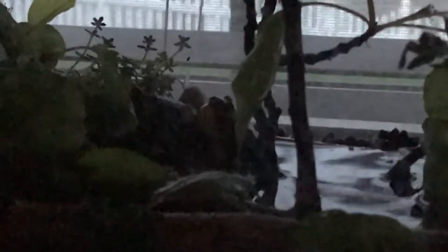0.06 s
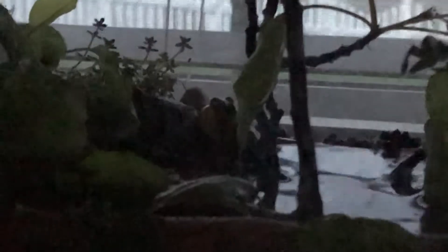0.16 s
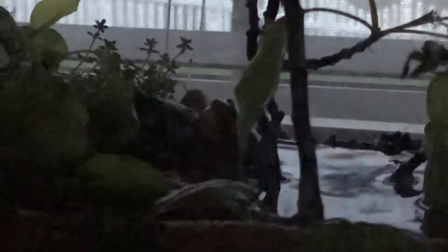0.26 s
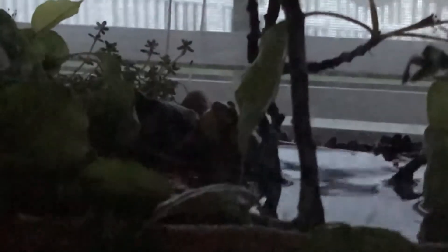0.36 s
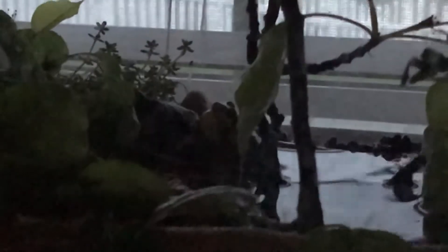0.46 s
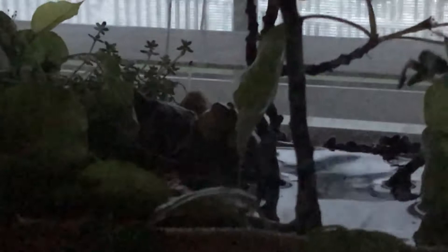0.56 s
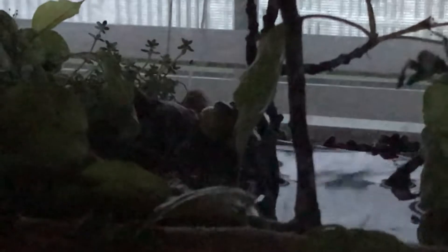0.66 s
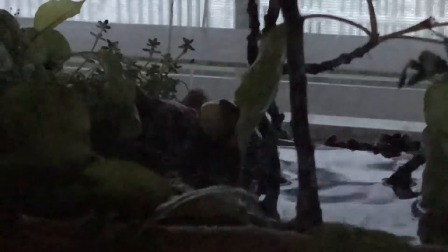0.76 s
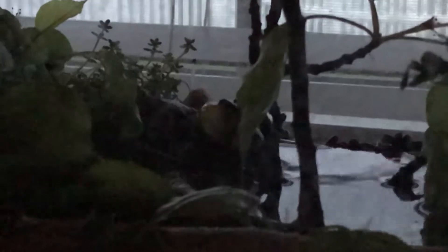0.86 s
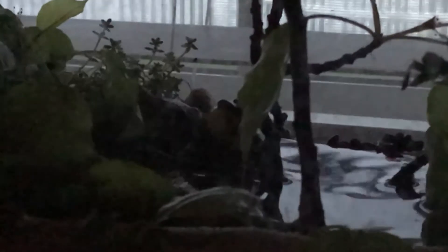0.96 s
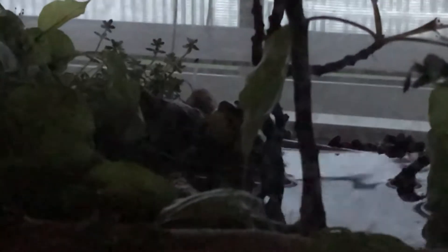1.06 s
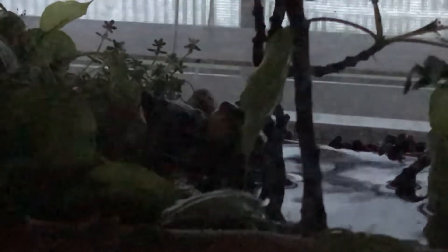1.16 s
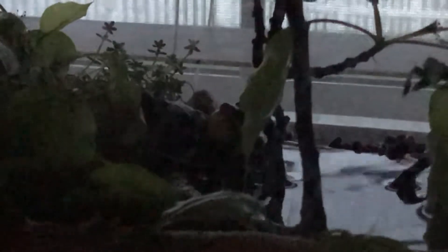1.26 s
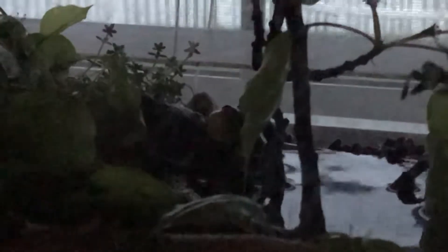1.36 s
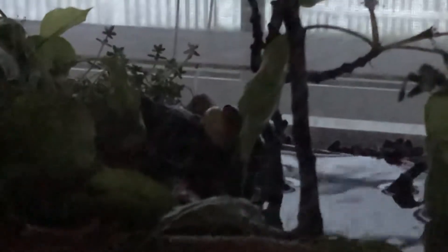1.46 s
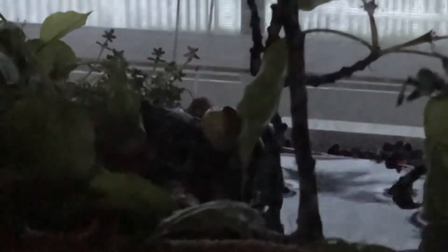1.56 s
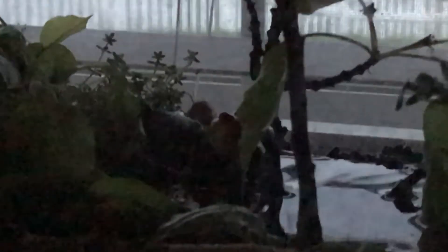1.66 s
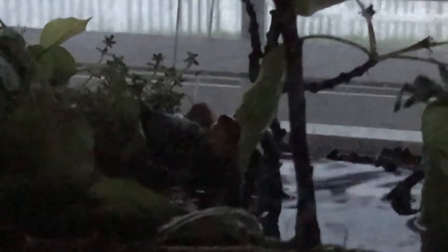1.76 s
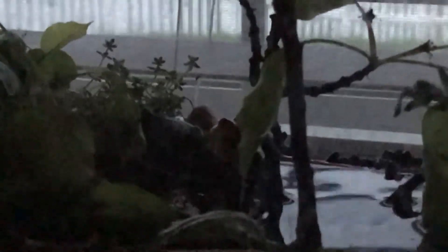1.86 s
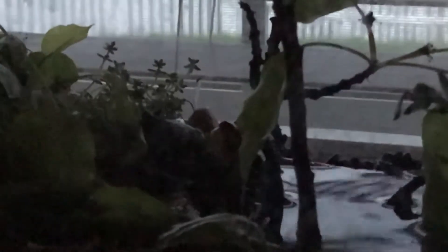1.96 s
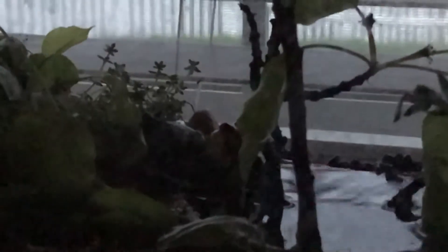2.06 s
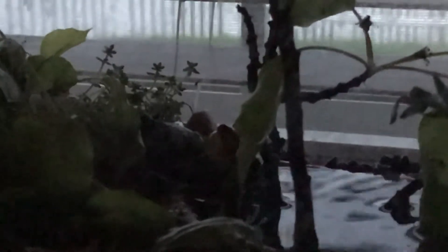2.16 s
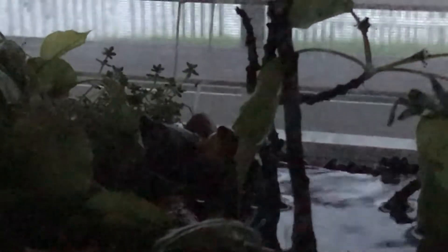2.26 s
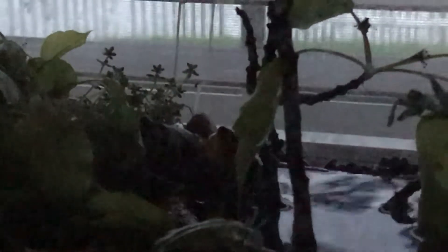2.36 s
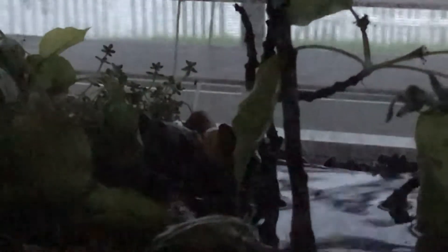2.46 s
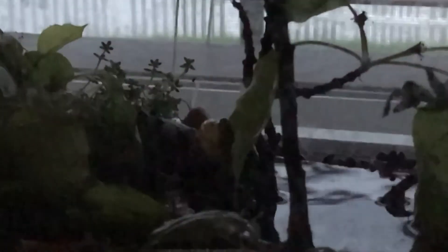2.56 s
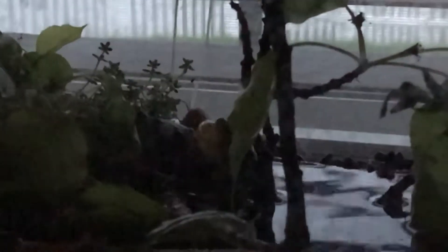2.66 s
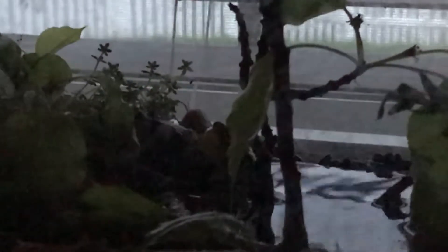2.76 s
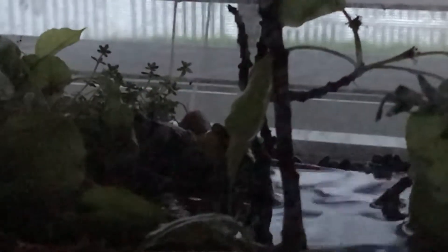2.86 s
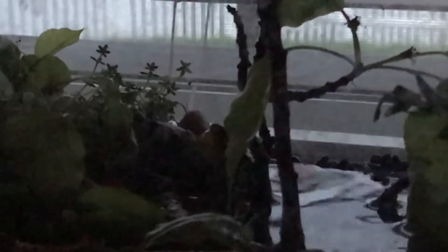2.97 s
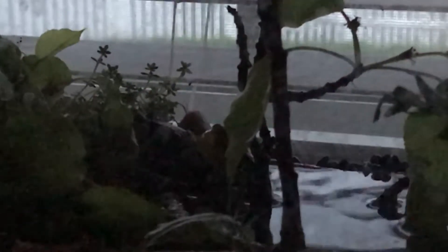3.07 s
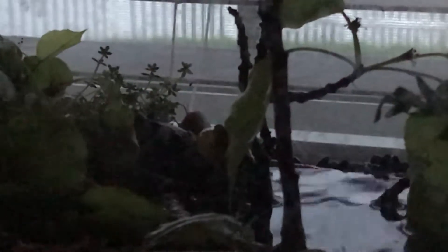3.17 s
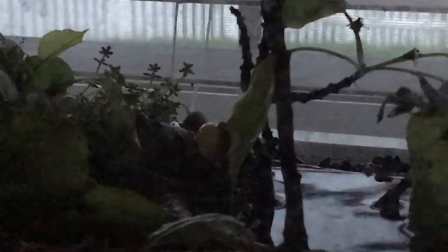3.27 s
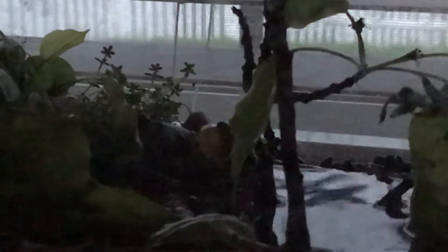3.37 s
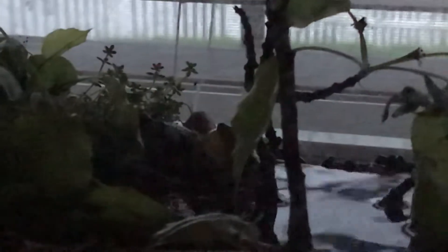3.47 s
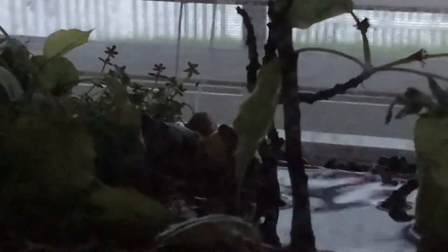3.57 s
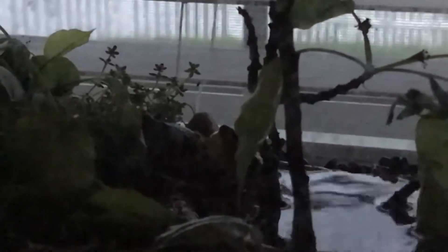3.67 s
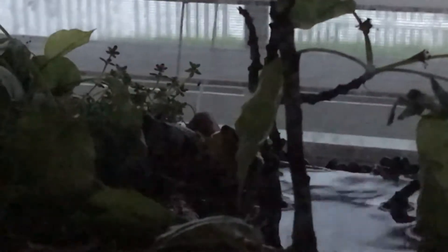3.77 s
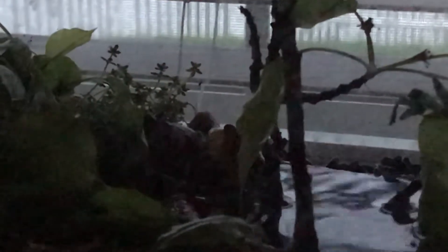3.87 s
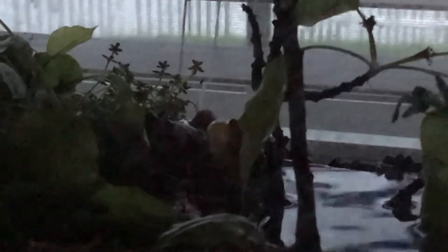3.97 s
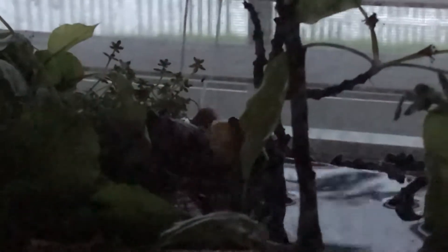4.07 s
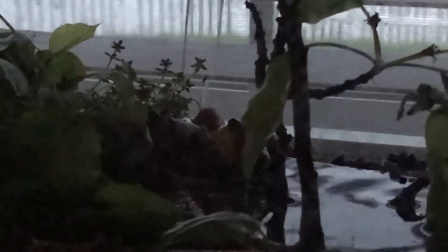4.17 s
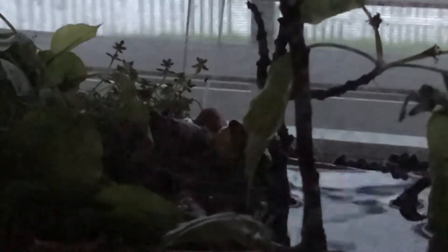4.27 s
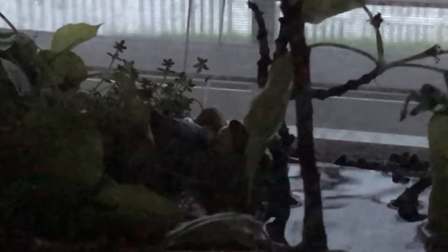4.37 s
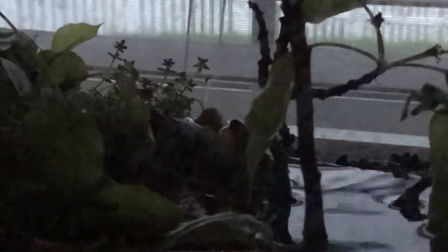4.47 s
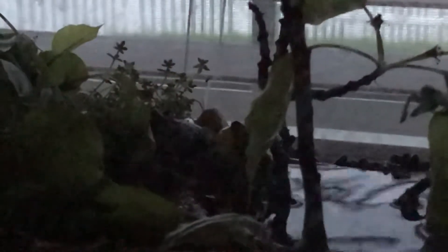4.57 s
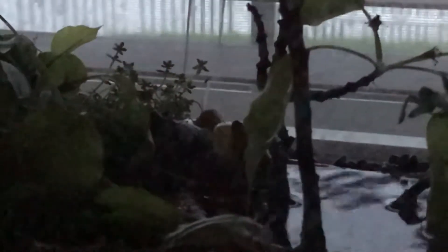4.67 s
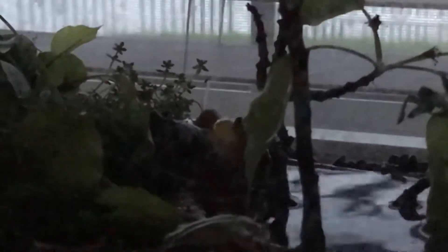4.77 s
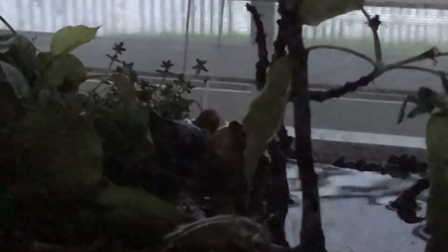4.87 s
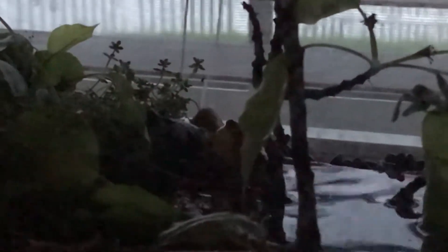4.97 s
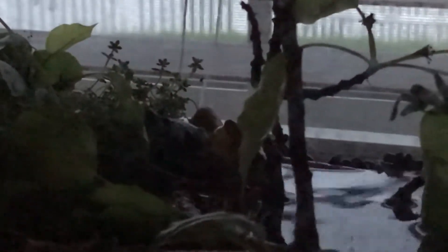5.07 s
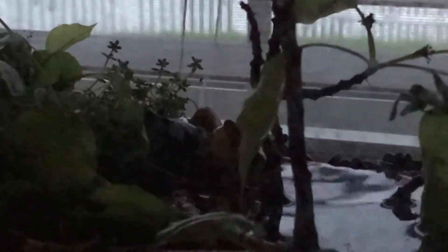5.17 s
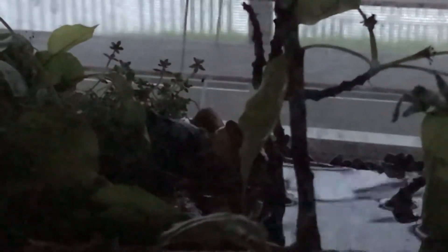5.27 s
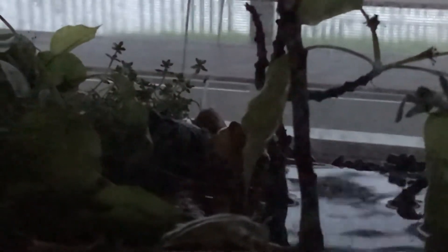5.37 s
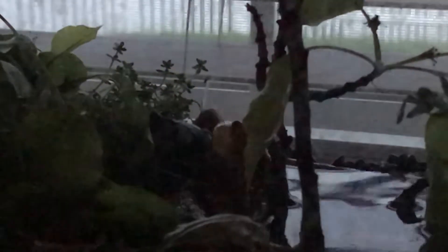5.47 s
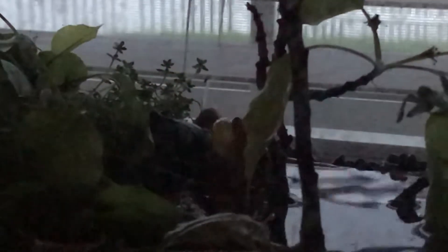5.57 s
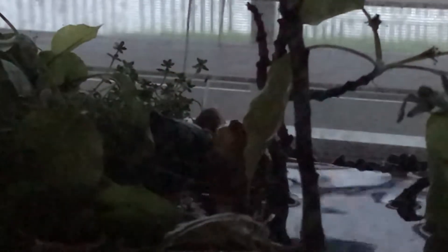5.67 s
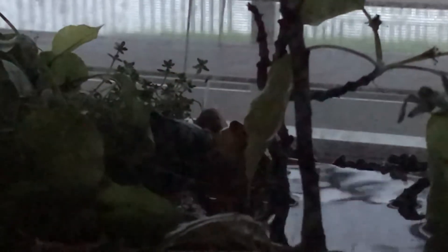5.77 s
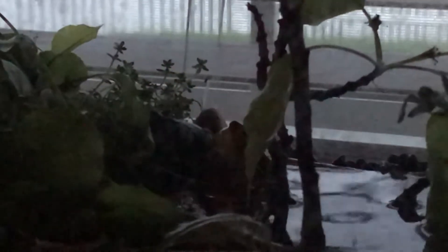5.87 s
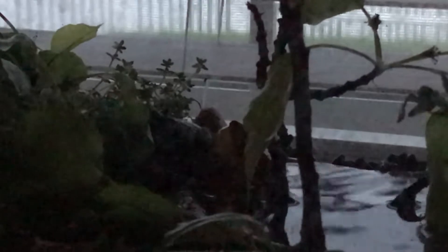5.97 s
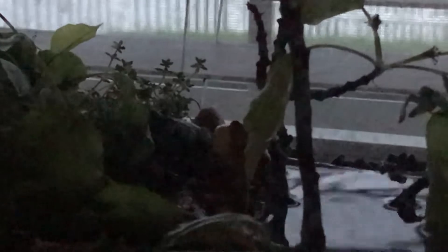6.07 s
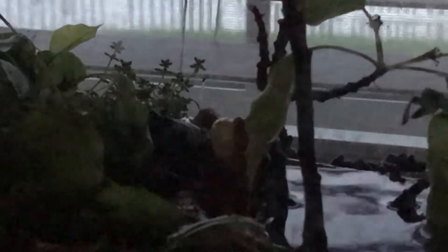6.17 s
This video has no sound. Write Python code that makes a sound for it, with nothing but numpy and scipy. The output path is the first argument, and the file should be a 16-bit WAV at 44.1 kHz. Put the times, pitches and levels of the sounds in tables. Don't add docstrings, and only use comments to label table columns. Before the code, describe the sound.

A small tree frog gives loud, short, raspy croaks at steady intervals in a glass tank while water drips and bubbles over low house rumble.

```python
import sys
import numpy as np
from scipy import signal
from scipy.io import wavfile
from scipy.ndimage import uniform_filter1d

SR = 44100
rng = np.random.default_rng(int(sys.argv[2]) if len(sys.argv) > 2 else 0)


def makeup_ratio(level_db):
    decades = np.asarray(level_db, float) / 20
    return 10 ** decades


def unload_wav(signal):
    wavfile.write(
        sys.argv[1],
        SR,
        np.round(np.clip(np.atleast_2d(signal).T, -1, 1) * 32767).astype(np.int16),
    )


N = 274743

# [t/s, peak level/dB, ring f/Hz]
FINE_SPRAY = [(.003, -42, 3280), (.2394, -63, 4450), (.312, -51, 9300), (.4628, -53, 2100),
              (2.199, -46, 11500), (1.8455, -54, 12000), (2.231, -45.5, 3380), (2.818, -51, 6100),
              (2.938, -52, 3400), (3.015, -50, 5370), (3.05, -45, 3540), (4.171, -44, 6100),
              (4.272, -54, 9270), (4.5714, -60, 3540), (5.1673, -46, 5060), (5.321, -48, 3280),
              (5.7223, -41, 2700), (.8565, -45, 8900), (.9108, -47, 9170), (1.3375, -48, 9520),
              (2.1634, -43.5, 9600), (3.8425, -42.5, 9700), (4.8663, -43, 9700), (4.9297, -48, 8550),
              (5.081, -35.5, 8600), (5.3627, -49, 13100), (5.505, -40, 12500), (5.73, -56, 9800),
              (5.9067, -45, 9540)]
# [t/s, peak level/dB, f/Hz]
OUTLET_BUBBLES = [(0.019, -37, 1125), (0.087, -46.5, 1540), (0.114, -48, 1540), (.2872, -50, 1490),
                  (0.6504, -47, 1220), (1.1857, -49, 1140), (1.2512, -40.5, 1120), (1.3388, -44.5, 1550),
                  (1.774, -47, 1200), (1.847, -45.5, 1126), (2.0697, -49, 1100), (2.324, -41.5, 1134),
                  (2.852, -37.5, 1590), (2.9435, -41, 1470), (3.024, -47.5, 1720), (3.0602, -47, 1137),
                  (3.698, -45.5, 1105), (3.7855, -43.5, 1070), (3.8223, -43.5, 1030), (3.8443, -38.5, 1380),
                  (4.342, -40, 1013), (4.5924, -48, 1050), (4.6164, -40, 830), (5.362, -44, 1540),
                  (5.3906, -48, 1120), (5.4247, -52, 1620), (5.8423, -46, 1470), (5.906, -44.5, 1460),
                  (5.9739, -45, 1720), (6.034, -43.5, 1570)]
# [t/s, peak level/dB, ring f/Hz]
LIGHT_DRIPS = [(0.0503, -54, 3670), (0.1024, -49, 3820), (.1516, -49.5, 5400), (0.357, -57, 5700),
               (.397, -62, 5100), (.4204, -57, 3430), (0.647, -52.5, 2730), (.9828, -50, 4260),
               (1.0592, -49.5, 5220), (1.0874, -46, 4380), (1.1863, -49.5, 4320), (1.196, -46, 6100),
               (1.8817, -46.5, 3810), (2.04, -47, 3440), (2.1485, -51.5, 5890), (2.3364, -50, 2240),
               (2.4507, -49, 3760), (2.8432, -45, 4290), (3.0994, -53.5, 5680), (3.6494, -49, 3520),
               (3.7874, -46.5, 3810), (4.2256, -51.5, 2810), (4.3414, -49, 2300), (4.4836, -48.5, 4860),
               (4.9723, -49, 3470), (5.137, -57, 3150), (5.3584, -55.5, 3500), (5.3943, -43.5, 3890),
               (5.9643, -47.5, 3860), (6.0326, -41, 4320)]
# [t/s, peak level/dB, ring f/Hz, time to fall 60 dB/s]
HEAVY_DROPS = [(0.2606, -41.5, 3610, 0.038), (.4828, -32.5, 4890, 0.025), (1.0211, -37, 4340, 0.036),
               (1.7645, -28.5, 6000, 0.015), (1.906, -27, 2520, 0.012), (1.9036, -34, 4740, 0.025),
               (2.2746, -37.5, 3580, 0.059), (2.294, -37.5, 4420, 0.057), (2.3094, -45.5, 3260, 0.081),
               (2.3834, -40, 2310, 0.045), (2.5026, -31.5, 3250, 0.069), (2.8514, -41, 3140, 0.058),
               (3.1785, -38.5, 3400, .02), (3.476, -38.5, 4600, 0.017), (3.6026, -42, 5920, 0.038),
               (3.69, -41, 3540, 0.059), (3.7103, -36, 5280, 0.02), (4.2978, -35, 5200, .022),
               (4.439, -40, 4240, .047), (4.4538, -37, 5320, 0.036), (4.5882, -42.5, 5180, 0.041),
               (4.637, -30.5, 2940, 0.012), (5.031, -45, 4340, 0.019), (5.2049, -35, 4210, 0.036),
               (5.2563, -39.5, 5260, 0.021), (5.4218, -41.5, 2320, 0.075), (5.7492, -38, 5120, .03),
               (5.821, -35.5, 3510, 0.026), (5.8457, -41.5, 3530, 0.058)]
# [f/Hz, level/dB per Hz]
RUMBLE_SPECTRUM = [(12, -57.5), (20, -28.5), (43, -21.5), (65, 1.5), (114, -7.5), (146, -1.5), (157, -11),
                   (170, -30.5), (220, -57.5), (370, -120)]
# [f/Hz, level/dB per Hz]
DRONE_SPECTRUM = [(97, -44), (165, -5.5), (210, 1.5), (322, -1.5), (361, 2), (480, -18.5), (524, -10),
                  (560, -11.5), (730, -11.5), (1230, -120)]
# [f/Hz, level/dB per Hz]
HISS_SPECTRUM = [(260, -31.5), (450, -2.5), (705, -9), (1140, -1.5), (1400, -9.5), (1530, -4.5), (2040, -6),
                 (3540, -6.5), (7690, -19.5), (13600, -16.5), (16000, -12)]
# [f/Hz, level/dB]
MAINS_HUM = [(59.2, -66)]
# [centre t/s, half length/s, rumble lift/dB, drone lift/dB]
HOUSE_SURGES = [
    (0.05, .3, 1, 1.5),
    (1.366, 0.04, 2.5, -1),
    (2.62, 0.075, 8, 4),
    (2.835, 0.083, 1, 9),
    (3.04, 0.046, 2.5, -2),
    (3.62, 0.063, 5, -2),
    (4.074, 0.13, 5, 7),
    (4.39, .07, 1.5, 2),
    (5.967, 0.14, 4, 1),
]
# [t/s, length/s, f/Hz, width/Hz, level/dB]
WALL_GROANS = [
    (2.62, 0.39, 207, 18, -55.5),
    (3.029, 0.045, 91, 21, -48),
    (3.558, 0.13, 210, 13, -60),
    (7.4, 0.09, 560, 39, -59.5),
    (4.02, .17, 270, 39, -56.5),
    (4.03, 0.22, 570, 100, -56),
    (4.31, 0.11, 218, 18, -58.5),
    (4.301, 0.108, 545, 23, -55.5),
    (4.3, 0.16, 720, 860, -58),
    (4.75, 0.19, 660, 220, -58),
]
# [t/s, length/s, effort level/dB, gear slip after t/s, larynx openings per second after the slip]
FROG_CROAKS = [
    (0.686, 0.21, -32, .05, 114),
    (1.394, 0.23, -31.5, 0.077, 113.6),
    (2.49, 0.21, -31, 0.062, 120),
    (3.185, 0.2, -30.5, 0.069, 117),
    (3.878, 0.2, -29.5, 0.05, 113),
    (4.649, 0.2, -30, .045, 119.5),
    (5.448, 0.2, -30, 0.074, 123.5),
    (6.09, 0.18, -30, .06, 110),
]
# [f/Hz, width/Hz, level/dB]
THROAT_RINGS = [(1084, 620, 5.5), (1437, 57, 10.5), (1720, 580, 4.5)]
# [f/Hz, width/Hz, level/dB]
MIDDLE_RINGS = [(1916, 70, -15), (2213, 1080, 7.5), (2575, 50, 11)]
# [f/Hz, width/Hz, level/dB]
SAC_RINGS = [(2672, 330, 1), (3196, 123, -10), (3555, 307, -12.5)]
# [f/Hz, width/Hz, level/dB]
UPPER_RINGS = [(4016, 750, 9.5), (4600, 134, 11), (5260, 1100, 6.5), (6084, 140, 3.5), (6380, 730, -3.5)]
# [f/Hz, width/Hz, level/dB]
BREATH_RINGS = [(8840, 1400, -2.4), (11620, 580, -0.49)]
# [delay t/s, level/dB]
GLASS_ECHOES = [
    (.0021, -31.5),
    (.0034, -12),
    (.0047, -16.5),
    (.0083, -17.5),
]
# [f/Hz, time to fall 60 dB/s]
ROOM_DECAY = [(600, 0.3), (1600, 0.3), (2700, 0.27), (4200, 0.38), (9000, 0.27), (15000, 0.017)]


def evened(x):
    return x / np.sqrt(np.mean(x ** 2) + 1e-20)


def read(points, hz):
    f, value = np.transpose(points)
    return np.interp(np.log(hz + 1), np.log(f + 1), value)


def add(mix, s, sound):
    part = mix[round(s * SR):][:len(sound)]
    part += sound[:len(part)]


def later(x, s):
    return np.pad(x, (round(s * SR), 0))[:len(x)]


def resonate(x, hz, width):
    turn = np.exp(2j * np.pi * np.cumsum(hz * np.ones(len(x))) / SR)
    r = np.exp(-np.pi * width / SR)
    smooth = signal.lfilter([(1 - r) ** 2], [1, -2 * r, r * r], x / turn)
    return 2 * (turn * smooth).real


def ring_together(x, modes):
    return sum((-1) ** k * makeup_ratio(db) * resonate(x, hz, width) for k, (hz, width, db) in enumerate(modes))


def drop(db, hz, tick_db, t60):
    t = np.arange(3500) / SR
    spray, fine = rng.standard_normal((2, 3500))
    ring = np.sin(2 * np.pi * hz * t * (1 + 0.98 * t)) * makeup_ratio(1.0 - 60 * t / max(0.37 * t60, .006))
    around = resonate(spray, 1.038 * hz, 0.39 * hz)
    above = resonate(spray, min(1.567 * hz, 15000), 0.21 * hz)
    splash = evened(around + 0.29 * above) * makeup_ratio(-9.0 - 60 * t / max(t60, .01))
    tick = evened(resonate(fine, 10500, 9000)) * makeup_ratio(tick_db - 6.0 - 60 * t / 0.01)
    return makeup_ratio(db - 8.5) * (ring + splash + tick) * np.clip(t / 0.0015, 0, 1)


def bubble(db, hz, cycles=5.5):
    u = np.arange(1500) / SR * hz / cycles
    tone = np.sin(2 * np.pi * cycles * u * (1 + 0.012 * u))
    return makeup_ratio(db - 0.5) * tone * u * np.exp(1 - 2.04 * u)


def water():
    drops, bubbles = np.zeros(N), np.zeros(N)
    for s, db, hz in FINE_SPRAY:
        add(drops, s, drop(db, hz, tick_db=-7.5, t60=0.016))
    for s, *row in OUTLET_BUBBLES:
        add(bubbles, s, bubble(*row))
    for s, db, hz in LIGHT_DRIPS:
        add(drops, s, drop(db, hz, tick_db=-3, t60=0.077))
    for s, db, hz, t60 in HEAVY_DROPS:
        add(drops, s, drop(db, hz, tick_db=-13, t60=t60))
    for when, size, pitch in rng.random((125, 3)):
        add(drops, when * N / SR, drop(-64 + 7.0 * size, 2300 * 4.5 ** pitch, tick_db=-2, t60=0.11))
    for when, size, pitch in rng.random((45, 3)):
        add(drops, when * N / SR, drop(-67 + 9 * size, 10800 * 1.35 ** pitch, tick_db=3.5, t60=0.08))
    for when, size, pitch in rng.random((20, 3)):
        add(bubbles, when * N / SR, bubble(-56 + 6 * size, 1050 * 1.5 ** pitch))
    return drops, bubbles


def noise(spectrum, patchy_db):
    hz = np.fft.rfftfreq(2048, 1 / SR)
    a, b, patches = rng.standard_normal((N // 512 + 5, 1025, 3)).T
    patches = uniform_filter1d(patches, size=16, axis=0)
    patches = evened(uniform_filter1d(patches, size=6, axis=1))
    z = (a + 1j * b) * makeup_ratio(read(spectrum, hz)[:, None] + patchy_db * patches)
    return evened(signal.istft(z, nperseg=2048, noverlap=1536)[1][:N])


def house():
    t = np.arange(N) / SR
    rumble_lift_db, drone_lift_db = sum(np.outer(lift_db, np.exp(-((t - s) / half) ** 2))
                                        for s, half, *lift_db in HOUSE_SURGES)
    out = makeup_ratio(-60.5 + rumble_lift_db) * noise(RUMBLE_SPECTRUM, patchy_db=0.4)
    out += makeup_ratio(-67 + drone_lift_db) * noise(DRONE_SPECTRUM, patchy_db=0.79)
    for start, length, hz, width, db in WALL_GROANS:
        fuzzy = resonate(rng.standard_normal(22050), hz, width)[-round(length * SR):]
        add(out, start, makeup_ratio(db) * evened(fuzzy) * np.hanning(len(fuzzy)))
    for hz, db in MAINS_HUM:
        out += makeup_ratio(db - 2.0) * evened(resonate(rng.standard_normal(N), hz, 4.1))
    return out + makeup_ratio(-65.5) * noise(HISS_SPECTRUM, patchy_db=1)


def breath_effort(t, length, top_db):
    effort_db = top_db - 8.5 * np.exp(-t / 0.011) - 6 * np.exp(-t / 0.034) - 15 * t
    return effort_db - 5.5 * np.clip(1 - (length - t) / 0.05, 0, 1)


def fold_buzz(t, slip_s, after):
    fold_hz, rough_upper, uneven_db = 555, 0.45, -1.6
    late = 124.6
    rate = np.interp(t, [slip_s - .006, slip_s + .006, .15, .17], [129.3, after, late, late - 4])
    rough = .12 + .33 * np.exp(-((t - slip_s) / .014) ** 2)
    rough += np.interp(t, [.01, .03, .15, .185], [.3, 0, 0, .4])
    openings = np.cumsum(rate) / SR
    phase, count = openings % 1, openings.astype(int)
    chance = rng.standard_normal((40, 5))[count]
    gate = np.sin(np.pi * np.clip(phase / .6, 0, 1)) ** 2
    gate *= makeup_ratio(uneven_db * chance[:, 0])
    drift = np.cumsum(rng.standard_normal(40))[count]
    tension = .88 + .22 * phase + .004 * drift + .04 * rough * chance[:, 1]
    turns = phase / rate * fold_hz * tension + .2 * rough * chance[:, 2]
    overtones = [np.cos(2 * np.pi * k * turns - .52 * k * k) for k in range(2, 14)]
    air = rng.standard_normal(12000)[:len(t)]
    low_air = evened(resonate(air, 1670, 2100))
    low = gate * (evened(sum(overtones[:6])) + rough * low_air) / np.hypot(1, rough)
    high_air = evened(resonate(air, 6650, 2800))
    high = (1 - rough_upper) * evened(sum(overtones[5:])) + rough_upper * high_air
    return low, (gate + 0.61) * high, (gate + 0.52) * air, chance


def upper_voice(t, high, hiss):
    edge_hz = np.interp(t, [0, .09, .17], [3100, 5700, 7000])
    modes = [(hz, width, db - .016 * np.maximum(hz - edge_hz, 0)) for hz, width, db in UPPER_RINGS]
    pocket = resonate(high, 0.918 * edge_hz, 600)
    pocket += makeup_ratio(-14) * resonate(hiss, np.interp(t, [.07, .16], [11900, 13100]), 900)
    return evened(ring_together(high, modes) + makeup_ratio(-2.0) * pocket)


def croak(start, length, top_db, slip_s, after):
    t = np.arange(0, length, 1 / SR)
    low, high, hiss, chance = fold_buzz(t, slip_s, after)
    sac_db = -8 + 11 * np.minimum(t / 0.14, 1)
    middle_db = -2.5 + np.where(t < 0.07, -12 * (1 - t / 0.07), -80 * (t - 0.07))
    bright_db = -17 - 29.5 * np.exp(-t / 0.018)
    shade = makeup_ratio(0.5 * uniform_filter1d(chance[:, 3:], size=200, axis=0)).T
    stretch = np.interp(t, [0, .05, .13, .18], [0.95, 1.055, 1.014, 0.94])
    slack = 0.5 * np.exp(-t / 0.077)
    throat = [(hz * stretch, width, db) for hz, width, db in THROAT_RINGS]
    sac = [(hz - slack * (hz - 2550), width, db) for hz, width, db in SAC_RINGS]
    breath = [(hz * (1 - 0.082 * slack), width, db) for hz, width, db in BREATH_RINGS]
    voice = evened(ring_together(low, throat))
    voice += makeup_ratio(middle_db) * shade[0] * evened(ring_together(later(low, .00052), MIDDLE_RINGS))
    voice += makeup_ratio(sac_db) * shade[1] * evened(ring_together(later(low, .00093), sac))
    voice += makeup_ratio(bright_db) * upper_voice(t, high, hiss)
    voice += makeup_ratio(-36.5) * evened(ring_together(hiss, breath))
    voice = signal.sosfilt(signal.butter(4, 640, "high", fs=SR, output="sos"), voice)
    fade = np.clip((t[-1] - t) / 0.023, 0, 1)
    return start, -makeup_ratio(breath_effort(t, length, top_db)) * voice * fade


def frog():
    out = np.zeros(N)
    for row in FROG_CROAKS:
        add(out, *croak(*row))
    return out


def room(x):
    out, turn = np.zeros(N), np.arange(N) / SR * 7.3
    for k in range(3):
        taps = np.zeros(22050)
        places = np.arange(300, 22000, 20) + rng.integers(0, 20, 1085)
        taps[places] = rng.choice([-1., 1.], 1085)
        hz, t, z = signal.stft(taps, SR, nperseg=256)
        tail = signal.istft(z * makeup_ratio(-60 * t / read(ROOM_DECAY, hz)[:, None]), SR, nperseg=256)[1]
        window = np.sqrt(2 / 3) * np.cos(np.pi * (turn + k / 3))
        out += signal.fftconvolve(x * window, tail / np.linalg.norm(tail))[:N]
    return out


def glass(x):
    out = x.copy()
    for k, (s, db) in enumerate(GLASS_ECHOES):
        add(out, s, (-1) ** k * makeup_ratio(db) * x)
    return out


def scene():
    drops, bubbles = water()
    background = house()
    voice = frog()
    wet = room(makeup_ratio(-6.0) * voice + makeup_ratio(3.5) * drops + makeup_ratio(-9.5) * bubbles)
    tank = makeup_ratio(4.5) * glass(voice + makeup_ratio(6.0) * drops)
    return (tank + bubbles + wet + background)[None]


def low_pass(x):
    return signal.sosfilt(signal.butter(12, 16330, fs=SR, output="sos"), x)


def record(dry):
    limited = signal.oaconvolve(dry, signal.firwin(201, 16000, fs=SR)[None], "same")
    return low_pass(limited)


dry = scene()
out = record(dry)
unload_wav(out)
```